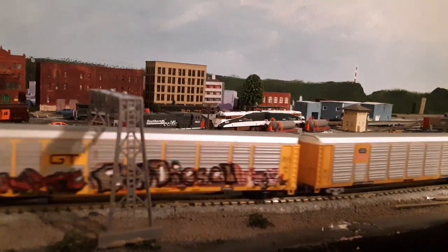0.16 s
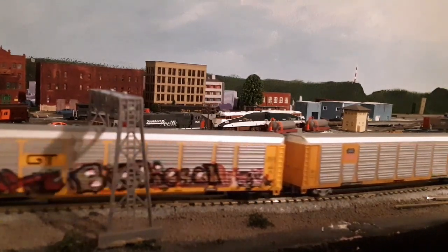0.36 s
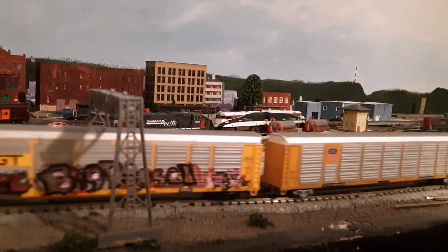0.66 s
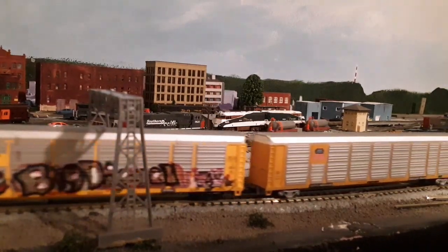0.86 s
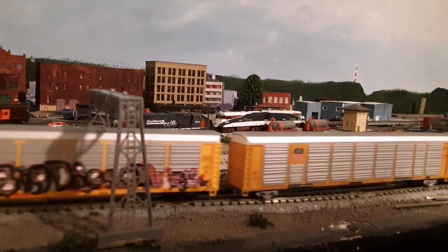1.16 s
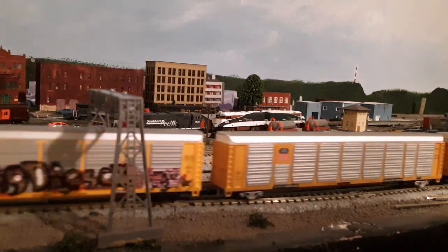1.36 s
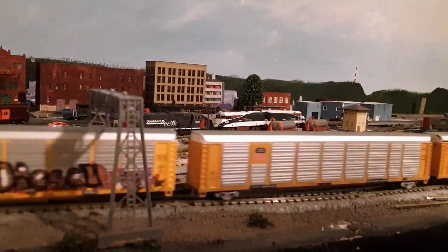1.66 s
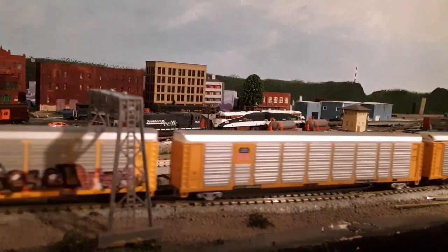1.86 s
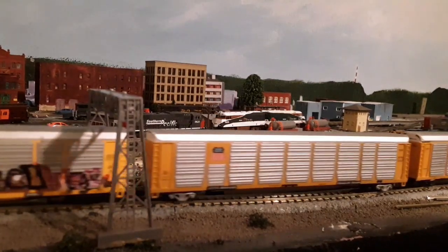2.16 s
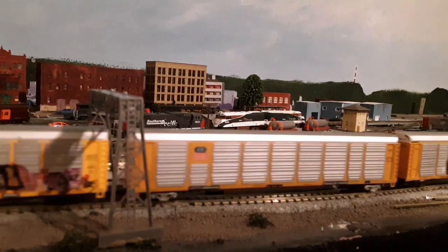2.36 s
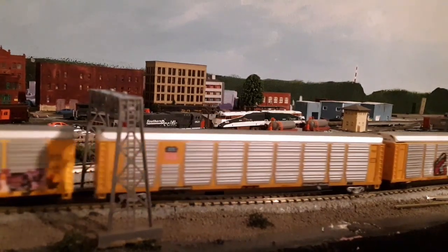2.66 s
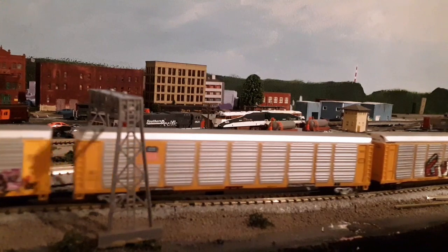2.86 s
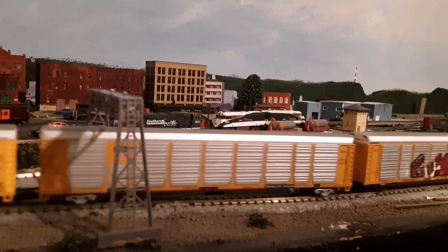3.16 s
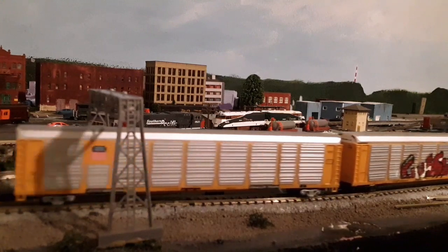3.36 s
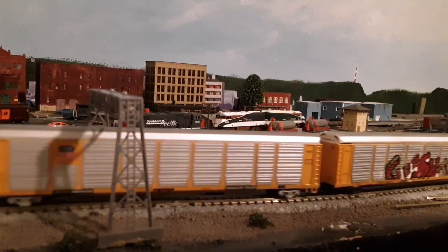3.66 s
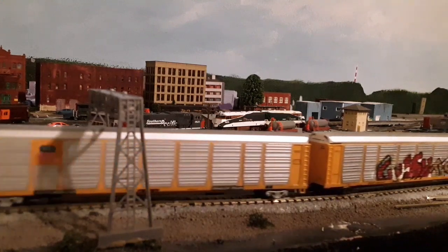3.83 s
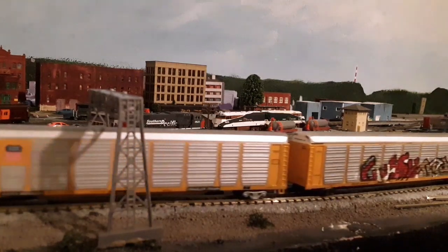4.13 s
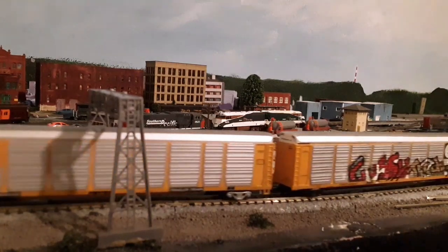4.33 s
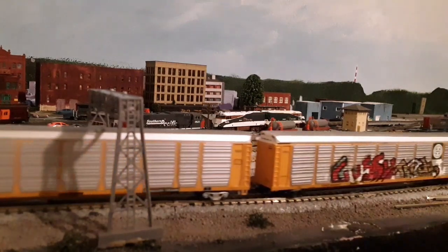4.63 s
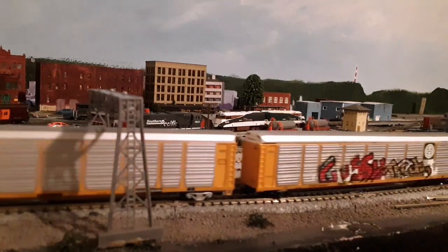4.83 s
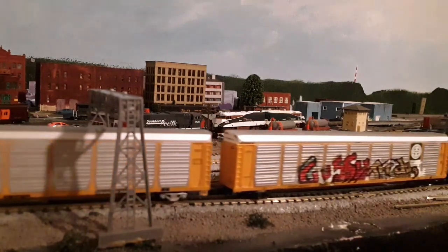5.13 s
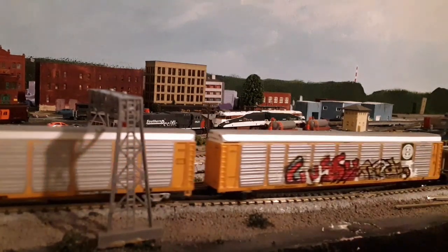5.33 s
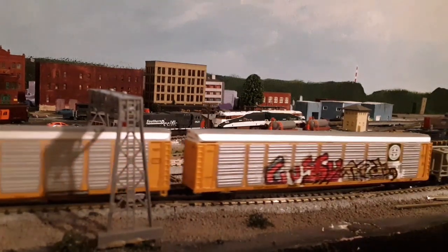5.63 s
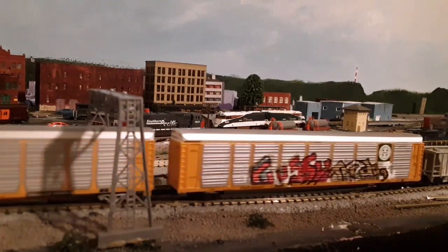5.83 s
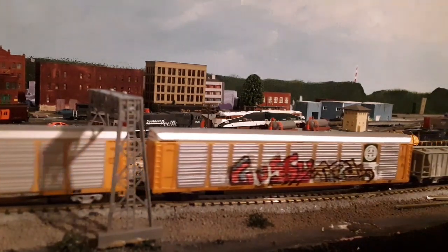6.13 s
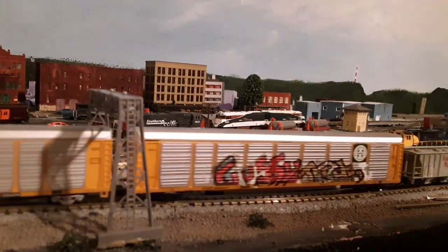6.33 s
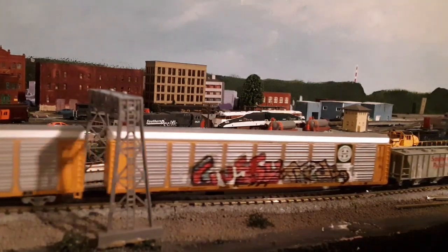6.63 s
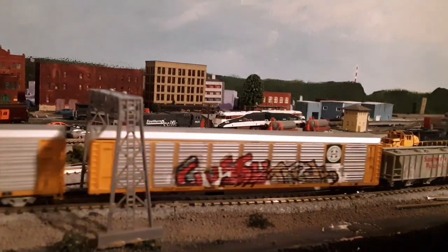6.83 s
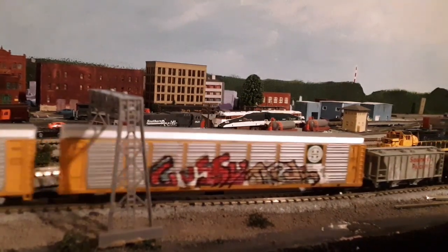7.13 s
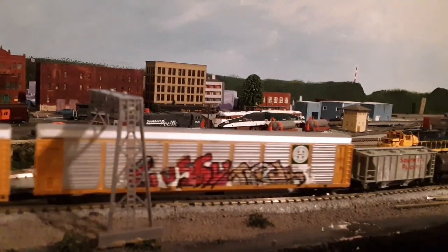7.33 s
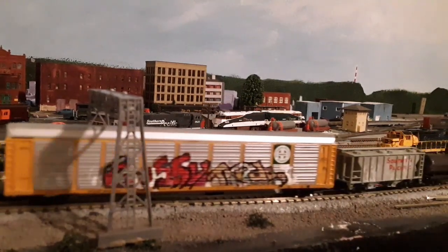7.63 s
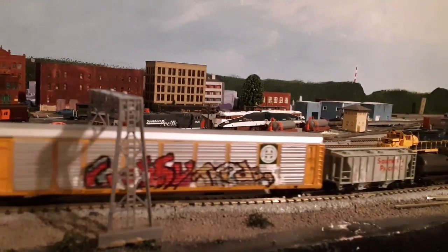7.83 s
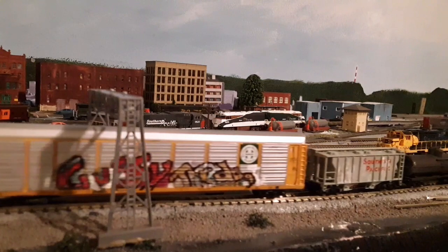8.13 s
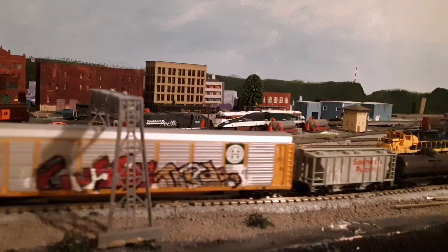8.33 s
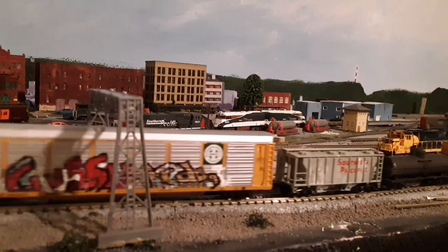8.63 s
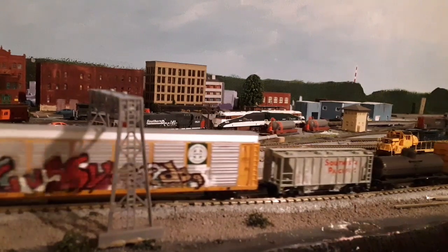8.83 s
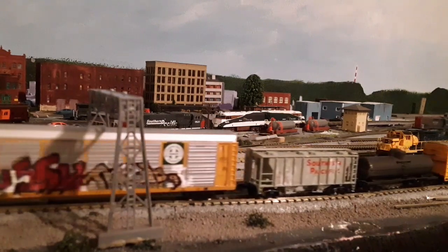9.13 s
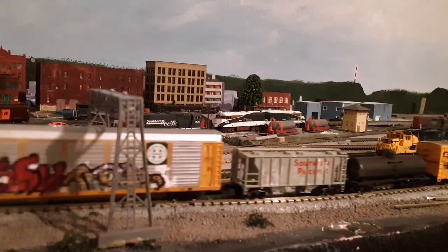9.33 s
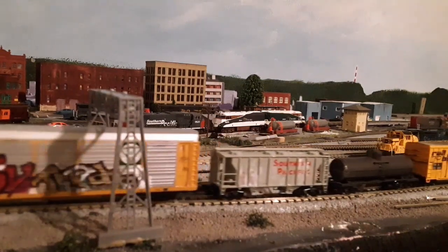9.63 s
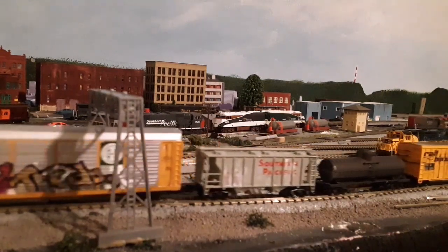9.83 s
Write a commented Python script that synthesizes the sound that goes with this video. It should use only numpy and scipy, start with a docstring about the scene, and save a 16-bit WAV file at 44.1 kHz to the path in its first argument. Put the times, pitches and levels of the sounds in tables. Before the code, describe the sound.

Close beside a model railway track, small wheels hiss and tick quietly, with light crackle and short brushes against the rail. Twice in the first half, the slack between the plastic freight cars runs out in a loud, sharp clatter that rings briefly in the small room. A duller jolt later thumps the board underneath, and lighter clacks follow as the rolling carries on.

```python
"""Small wheels hiss and tick as model freight cars roll slowly past a stereo microphone at trackside.
Now and then slack runs through the train: a sharp rattling clack rings in the hollow plastic shells
and the small room. Rough treads keep the cars and the baseboard droning, flanges brush the rail and
specks crackle under the wheels. Late on, a jolt thumps the board; near the end it hums briefly."""
import sys
import numpy as np
from scipy import signal
from scipy.fft import rfft, irfft, next_fast_len
from scipy.io import wavfile

SR = 44100
rng = np.random.default_rng(int(sys.argv[2]) if len(sys.argv) > 2 else 0)


def digitize_waveform(pressure):
    """Quantize a signal to 16-bit integers and store it at the path in sys.argv[1].

    Rows of a 2-D input are taken as channels; values are limited to [-1, 1].
    """
    field = np.atleast_2d(pressure).T
    bounded = np.clip(field, -1, 1)
    quanta = np.round(bounded * 32767).astype(np.int16)
    wavfile.write(sys.argv[1], SR, quanta)


N = 440118
TIME = np.arange(N) / SR
FFT_SIZE = next_fast_len(N, True)
FFT_HZ = np.fft.rfftfreq(FFT_SIZE, 1 / SR)
LEFT_RIGHT = np.array([[.5], [-.5]])  # splits a pan_db between the microphones; positive is left

# Jolts of the cars, heard from trackside:
# start_s, level_db, bass_db, middle_db, top_db, pan_db, ring_db, lower_note_hz, upper_note_hz
JOLTS = [(1.1584, -46, -1.5, 4, -6, 13, 3.5, 2040, 2750), (1.179, -35, -1, -2.5, 2.5, 11, 3, 1740, 3600),
         (1.2077, -19.5, -3.5, -8.5, -2.5, -2, -6.5, 4800, 6100),
         (3.136, -52, -11, 7.5, -12, 5, -8, 1920, 2820),
         (3.252, -47.5, -5, -13, -10.5, -5, -1.5, 2000, 5700),
         (3.516, -48.5, -5, -2, -6, -3, -0.5, 1175, 3300),
         (3.5268, -43.5, -4, 1.5, -1, 10, 5.5, 1660, 3300),
         (3.5521, -22.5, -8, -1.5, 1, -1.5, -7.5, 1600, 2650),
         (3.5884, -19.5, -5, -4.5, -2, -7, -2, 1190, 3250),
         (7.398, -28, -1.5, -1, -9.5, -8, -4, 2060, 3800),
         (7.9475, -37.5, -10, 0.5, -12.5, -7, -1, 1660, 3250),
         (8.08, -53, -14.5, 0.5, -17, -6, 1.5, 1570, 2930),
         (9.89, -39.5, -13, -2, -5, -10.5, -13.5, 1560, 6640)]
# Tone shared by all jolts: frequency_hz, gain_db
JOLT_SPECTRUM = [(30, -35.5), (100, -7.5), (250, -4.5), (700, -6), (1100, -5), (1700, -6.5), (2800, -3.5),
                 (4000, -3.5), (5500, -0.5), (6800, -0.5), (7400, -8), (9000, -10.5), (11500, -5),
                 (16000, -6.5)]
def clacks(trim_db=-0.84, ring_trim_db=1.5, note_width_hz=400, hard_db=-21.5, lift_per_db=0.184):
    """Slack runs through the cars: a hard jolt shakes a whole shell, a light one favours two notes."""
    out = np.zeros((2, N))
    for start, db, bass, middle, top, pan, ring, lower, upper in JOLTS:
        tone = [(600, bass), (1100, (bass + middle) / 2), (1500, middle), (2400, middle),
                (3800, 0), (6500, 0.0077), (9500, top)]
        hit = strike(pan, ring + ring_trim_db, chatter_s=0.00098)
        lift_db = 3.5 + lift_per_db * (hard_db - db)

        def colour_db(hz):
            notes = lift_db * (bell(hz, lower, note_width_hz) + 0.73 * bell(hz, upper, note_width_hz))
            uneven = 1.2 * ripple(hz) / (1 + (hz / 9000) ** 4)
            return spectrum(JOLT_SPECTRUM, hz) + spectrum(tone, hz) + notes + uneven

        add(out, start, amp(db + trim_db) * through_shell(hit, colour_db))
    return out


def strike(pan_db, ring_db, chatter_s, echo_db=-16, echoes=6, lag_s=.0004, thin_hz=700, size=24576):
    """A brief chatter of contact, first bounces off the board and cars, then the ring-out."""
    out = amp(ring_db) * ring_out(size)
    t = np.arange(512) / SR
    envelope = t / chatter_s * np.exp(-t / chatter_s)
    contact = envelope * rng.standard_normal(len(t))
    for _ in range(3):  # a hard contact is short and excites all frequencies evenly
        contact = np.sqrt(envelope) * irfft(np.exp(1j * np.angle(rfft(contact))))
    pole = np.exp(-2 * np.pi * thin_hz / SR)
    contact = signal.lfilter([1, -1], [1, -pole], contact)  # small parts radiate little bass
    contact *= np.sqrt(.0025 * SR / np.sum(contact ** 2))  # same energy for every contact
    for mic, gain in enumerate(sides(pan_db)[:, 0]):
        channel = out[mic:mic + 1]
        far = (mic == 0) == (pan_db < 0)  # the far microphone hears it later
        add(channel, lag_s * far, gain * contact[None])
        for delay_s, sign in zip(rng.uniform(.003, .012, echoes), rng.choice([-1, 1], echoes)):
            add(channel, delay_s, sign * gain * amp(echo_db) * contact[None])
    return out


# Decay of the cars and the small room around them: frequency_hz, t60_s
RING_DECAY = [(150, 0.25), (500, 0.28), (1500, 0.27), (3000, 0.25), (6000, 0.22), (9000, 0.22),
              (15000, 0.18)]
# Side from which that ring reaches the microphones: frequency_hz, pan_db
RING_PAN = [(150, 3), (300, 2.5), (600, 0.5), (1200, -0.5), (2400, 0.5), (4500, -3), (8000, -1.5),
            (13000, -0.5)]
def ring_out(size, late_db=-32, late_t60_s=0.64, build_s=0.0015, bass_build_cycles=4.1):
    """Dense reflections: treble arrives at once and dies first, bass builds up slowly."""
    t, hz = axes(size)
    field = diffuse(hz) * amp(spectrum(RING_PAN, hz) * LEFT_RIGHT)
    noise, out = rfft(unit(irfft(field))), 0
    centres = [f for f, _ in RING_DECAY]
    for (f, t60), pick in zip(RING_DECAY, np.eye(len(RING_DECAY))):
        band = irfft(noise * spectrum(np.c_[centres, pick], hz))
        fall = np.hypot(amp(-60 * t / t60), amp(late_db - 60 * t / late_t60_s))
        rise_s = build_s + bass_build_cycles / f * (f < 1000)
        out = out + band * fall * (1 - np.exp(-t / rise_s))
    return out


# Resonances of wheels and plastic shells: centre_hz, width_hz, lift_db
SHELL_MODES = [(1864, 400, 2.5), (2650, 160, 2), (3380, 490, 1), (4550, 230, 0.5), (5120, 280, 1),
               (6040, 310, 3.5), (6550, 210, 4.5)]
def shell_db(hz):
    """Wheels and shells lift their own bands in the clicks and the hiss."""
    return sum(db * bell(hz, centre, width) for centre, width, db in SHELL_MODES)


def through_shell(x, colour_db, size=4096):
    """A click rings through a tone curve and the shell modes, its loudness set by the 3-7 kHz band."""
    _, hz = axes(size)
    gain = amp(colour_db(hz) + shell_db(hz))
    gain /= np.sqrt(np.mean(gain ** 2 * ((hz > 3000) & (hz < 7000))))
    log_gain = np.log(np.r_[gain, gain[-2:0:-1]] + 1e-6)
    taps = np.fft.ifft(np.exp(np.conj(signal.hilbert(log_gain)))).real  # minimum phase
    return signal.oaconvolve(x, taps[None, :size // 2], axes=1)[:, :x.shape[1]]


# Rolling noise as the cars pass the microphones: time_s, hiss_db, drone_db
ROLL_LEVELS = [(0.0, -61, -73), (1.06, -60.5, -69), (1.44, -59.5, -68), (1.68, -62.5, -71),
               (2.52, -59, -71.5), (3.08, -61.0, -68), (3.32, -57, -68.5), (4.56, -67.5, -74.5),
               (4.8, -63, -70.5), (5.32, -63.3, -70.5), (5.48, -65, -70.5), (6.34, -63, -69.7),
               (7.8, -62.5, -69), (8.32, -60, -67.5), (8.72, -62, -69.5), (8.92, -57.3, -66.5),
               (9.08, -62, -69.4), (9.98, -59.5, -71.5)]
# Wheel hiss, car-body drone and the layout's rumble, each: frequency_hz, gain_db
HISS_SPECTRUM = [(300, -17.5), (900, -19), (1400, -6), (2000, 2), (2400, -2.5), (2900, -1), (4100, -4),
                 (6800, -7), (7400, -19), (8500, -20), (11000, -30), (16000, -30)]
DRONE_SPECTRUM = [(60, -40), (180, 6.5), (280, -1), (380, -2.5), (600, -1.5), (800, -3), (1150, 3),
                  (1600, 0.5), (3000, -28)]
RUMBLE_SPECTRUM = [(15, -18), (40, -15.5), (70, -9), (105, -0.5), (160, -3), (240, -8.5), (400, -28),
                   (1500, -27)]
# Where the rolling sits between the microphones: frequency_hz, pan_db
ROLL_PAN = [(100, 0.5), (250, 3.5), (700, 4.5), (1400, 2), (2100, 3), (2800, 9), (4400, 2.5), (6500, -2.5),
            (9000, 3), (15000, -2)]
def rolling(hiss_trim_db=-0.26, drone_trim_db=0.87, near_db=-8, lag_s=0.000419):
    """Rough treads on rail excite wheels, car bodies and board, unevenly as the wheels turn."""
    pan_db = spectrum(ROLL_PAN, FFT_HZ) * LEFT_RIGHT
    delay = np.exp(-2j * np.pi * FFT_HZ * np.array([[0], [lag_s]]))  # the nearest wheels are on the left

    def noise(table, lift_db=0):
        field = diffuse(FFT_HZ) + amp(near_db) * diffuse(FFT_HZ)[0] * delay
        return unit(waveform(field * amp(spectrum(table, FFT_HZ) + lift_db + pan_db)))

    hiss_db, drone_db = curves(ROLL_LEVELS)
    surge = drift(8.6)
    hiss = noise(HISS_SPECTRUM, shell_db(FFT_HZ))
    hiss *= amp(hiss_db + hiss_trim_db + 0.85 * surge + 1.44 * drift(122))
    # the long cars' ring dies away as they leave
    hiss = lifted(hiss, bell(FFT_HZ, 1960, 320), lift_db=2.5 - 0.51 * TIME)
    # the wheels rub harder and softer, mostly in the treble
    treble = FFT_HZ ** 4 / (FFT_HZ ** 4 + 4000 ** 4)
    hiss = lifted(hiss, treble, lift_db=2 * drift(3.5))
    drone = noise(DRONE_SPECTRUM) * amp(drone_db + drone_trim_db + 2.5 * surge)
    rumble = noise(RUMBLE_SPECTRUM) * amp(-73 + 0.3041 * TIME)
    return hiss + drone + rumble


def passing_sides(x, depth_db=1.77, cars=7):
    """Reflections off the moving car sides comb the sound; the comb changes from car to car."""
    hz, t, frames = signal.stft(x, SR, nperseg=2048)
    place = t / t[-1] * (cars - 1)
    fades = [np.sqrt(np.maximum(1 - abs(place - car), 0)) for car in range(cars)]
    comb = sum(fade * ripple(hz, longest_s=.014)[:, None] for fade in fades)
    band = ((hz > 250) & (hz < 7000))[:, None]
    return signal.istft(frames * amp(depth_db * comb * band), SR, nperseg=2048)[1][:, :N]


# Wheel taps that stand out at trackside: start_s, level_db, pan_db
WHEEL_TAPS = [(0.4152, -53.5, 7), (0.6779, -56, -9), (2.2464, -53, -15), (2.2968, -52.5, -20),
              (2.4537, -53, 8), (2.5098, -53, -10), (2.665, -50.5, 19), (3.355, -55, -10),
              (3.4812, -48.5, 10), (3.9874, -49.5, 8), (5.003, -57, 2), (5.452, -60, 3),
              (6.1749, -52.5, -14), (6.4977, -54, -25), (6.835, -51, 4), (8.909, -55.5, -15),
              (9.2764, -56.5, 5)]
# Tone of a small contact on the rail: frequency_hz, gain_db
TAP_SPECTRUM = [(100, -33), (1000, -16.5), (2000, -9), (3200, -2), (4600, -1.5), (6000, 0), (6900, 0),
                (7700, -9.5), (10000, -14), (16000, -18)]
def ticks(trim_db=2.5, hard_db=-46, top_per_db=.8):
    """Single wheels tap drily over flaws in the rail; the harder, the brighter."""
    out = np.zeros((2, N))
    for start, db, pan in list(WHEEL_TAPS) + faint_taps():
        tap = strike(pan, ring_db=-14, chatter_s=0.00083, size=8192)
        tone = [(6500, 0), (9000, 2 + top_per_db * (db - hard_db))]
        tap = through_shell(tap, lambda hz: spectrum(TAP_SPECTRUM, hz) + spectrum(tone, hz))
        add(out, start, amp(db + trim_db) * tap)
    return out


def faint_taps(per_s=3.1, lift_db=3.5, spread_db=1.7, pan_spread_db=10, candidates=60):
    """Fainter taps fall at random and follow the hiss level; rows like WHEEL_TAPS."""
    when, chance = rng.random((2, candidates))
    softness, side = rng.standard_normal((2, candidates))
    hiss_db = curves(ROLL_LEVELS)[0][(when * N).astype(int)]
    rows = np.c_[when * N / SR, hiss_db + lift_db - spread_db * softness, pan_spread_db * side]
    return list(rows[chance < per_s * N / SR / candidates])


# Modes of the board under the track: pitch_hz, relative_db, t60_s
BOARD_MODES = [(42, -16, 0.33), (163, 4.5, 0.16), (288, 4.5, 0.11), (608, 1.5, 0.13), (804, -12, .1)]
def board_thump(start_s=7.402, gain_db=-45, rise_s=0.0097):
    """One heavy jolt sets the baseboard's modes ringing."""
    t = np.maximum(TIME - start_s, 0)
    modes = sum(amp(db - 60 * t / t60) * np.sin(2 * np.pi * f * t) for f, db, t60 in BOARD_MODES)
    return amp(gain_db) * modes * (1 - np.exp(-t / rise_s))


def board_hum(on_s=8.2, off_s=8.98, pitch_hz=156, waver_hz=1.5, peak_db=-65.5, flutter_db=2):
    """One mode of the board hums: it rises, swells slowly and dies."""
    turns = np.cumsum(pitch_hz + waver_hz * drift(7)) / SR
    swell_db = peak_db + 2 * (TIME - off_s)
    fade_db = 47 * np.maximum(on_s - TIME, 0) + 65 * np.maximum(TIME - off_s, 0)
    envelope = amp(swell_db - fade_db + flutter_db * drift(16))
    return envelope * unit(np.sin(2 * np.pi * turns)) * sides(pan_db=2)


# Soft knocks from the passing cars: start_s, level_db, pitch_hz
BODY_KNOCKS = [(3.261, -68, 435), (7.511, -49, 477), (7.848, -56, 443), (8.34, -62.5, 465)]
def knocks(t60_s=0.27, rise_s=0.0042, width_hz=140, size=16384):
    """A hollow car body rings dully in one narrow band."""
    out = np.zeros((2, N))
    t, hz = axes(size)
    for start, db, pitch in BODY_KNOCKS:
        body = unit(irfft(diffuse(hz) * bell(hz, pitch, width_hz)))
        add(out, start, amp(db) * body * (1 - np.exp(-t / rise_s)) * amp(-60 * t / t60_s))
    return out


# Flange rubs, spread across both microphones: start_s, length_s, level_db, centre_hz
FLANGE_RUBS = [(0.118, .1, -62, 2980), (0.83, 0.21, -63.5, 2800), (1.356, 0.021, -55.5, 2014),
               (1.566, 0.024, -59, 2600), (2.363, 0.047, -56.5, 2610), (4.928, 0.14, -63, 2700),
               (5.631, 0.13, -61, 2100), (6.132, 0.17, -60.5, 2120), (6.401, .07, -63, 2200),
               (6.83, .06, -64, 2800)]
def flange_scrapes(size=16384):
    """Flanges brush the rail in short swells of rough friction."""
    out = np.zeros((2, N))
    t, hz = axes(size)
    colour = amp(spectrum(HISS_SPECTRUM, hz) + shell_db(hz))
    for start, length, db, centre in FLANGE_RUBS:
        rub = unit(irfft(diffuse(hz) * colour * bell(hz, centre, width=centre)))
        age = t / (length / 2)  # 1 at the crest of the swell
        add(out, start, amp(db) * rub * age * np.exp((1 - age ** 2) / 2))
    return out


# Air notes of the later cars, a little to the left: pitch_hz, level_db
HOLLOW_NOTES = [(585, -85), (735, -82.5), (1120, -81.5)]
def body_notes(boom_hz=107, near_s=4.6, rise_s=0.22, wander_db=4.5):
    """The board's boom fades as the head of the train leaves; hollow cars ring as they draw near."""
    def note(pitch_hz, width_hz):
        return unit(waveform(diffuse(FFT_HZ) * bell(FFT_HZ, pitch_hz, width_hz)))

    boom = amp(-71 - 2 * TIME) * note(boom_hz, width_hz=30)
    hollow = sum(amp(db + wander_db * drift(1)) * note(f, width_hz=130) for f, db in HOLLOW_NOTES)
    arrival = np.clip((TIME - near_s) / rise_s, 0, 1)
    return boom + hollow * arrival * sides(pan_db=3)


def grit(per_s=40, level_db=-73):
    """Specks on the rails crackle under the many wheels, following the hiss level."""
    strength = amp(3.6 * np.minimum(rng.exponential(1, (2, N)), 3))
    specks = strength * rng.choice([-1, 1], (2, N)) * (rng.random((2, N)) < per_s / SR)
    click = strike(pan_db=0, ring_db=-15, chatter_s=0.00033, size=8192)
    crackle = signal.oaconvolve(specks, click, axes=1)[:, :N]
    crackle = through_shell(crackle, lambda hz: spectrum(TAP_SPECTRUM, hz))
    return amp(level_db) * unit(crackle * amp(curves(ROLL_LEVELS)[0]))


def microphone_hiss(level_db=-78):
    """Steady self-noise, the same whether wheels are near or far."""
    return amp(level_db) * rng.standard_normal((2, N))


# How alike the room sounds at the two microphones: frequency_hz, coherence
MIC_COHERENCE = [(50, 0.43), (130, 0.8), (290, 0.57), (640, 0.27), (1400, -0.2), (3000, -0.033),
                 (16000, -0.024)]
def diffuse(hz):
    """Spectra of diffuse noise at the left and right microphones."""
    a, b, c, d = rng.standard_normal((4, len(hz)))
    same = np.clip(spectrum(MIC_COHERENCE, hz), -1, 1)
    left = a + 1j * b
    return np.array([left, same * left + np.sqrt(1 - same ** 2) * (c + 1j * d)])


def ripple(hz, longest_s=.008, count=24):
    """Comb of rms 1 that nearby surfaces put on a spectrum."""
    cycles = (hz * rng.uniform(0.001026, longest_s) + rng.random() for _ in range(count))
    return unit(sum(np.cos(2 * np.pi * c) for c in cycles))


def drift(rate_hz):
    """Random wander of rms 1."""
    return unit(waveform(rfft(rng.standard_normal(FFT_SIZE)) * np.exp(-(FFT_HZ / rate_hz) ** 2)))


def lifted(x, band, lift_db):
    """Raises or lowers one band by a level that changes in time."""
    return x + (amp(lift_db) - 1) * waveform(rfft(x, FFT_SIZE) * band)


def bell(hz, centre, width):
    """Height of a resonance, 1 at its centre."""
    return 1 / (1 + (2 * (hz - centre) / width) ** 2)


def spectrum(points, hz):
    """Interpolates a table on a log-frequency axis."""
    f, value = np.transpose(points)
    return np.interp(np.log(hz + 1), np.log(f + 1), value)


def curves(rows):
    """Each column of a time table, sample by sample."""
    times, *columns = np.transpose(rows)
    return [np.interp(TIME, times, column) for column in columns]


def axes(size):
    return np.arange(size) / SR, np.fft.rfftfreq(size, 1 / SR)


def waveform(bins):
    return irfft(bins, FFT_SIZE)[..., :N]


def sides(pan_db):
    """Left and right gains of constant power."""
    return unit(amp(pan_db * LEFT_RIGHT))


def amp(db):
    return 10 ** (np.asarray(db) / 20)


def unit(x):
    """Scales to rms 1."""
    return x / np.sqrt(np.mean(x ** 2) + 1e-20)


def add(mix, start_s, sound):
    part = mix[:, max(round(start_s * SR), 0):][:, :sound.shape[1]]
    part += sound[:, :part.shape[1]]


def scene():
    """From beside the track: a rolling bed, loud jolts, the board beneath and small ticks."""
    bed = passing_sides(rolling() + flange_scrapes()) + body_notes() + grit() + microphone_hiss()
    return bed + clacks() + knocks() + board_thump() + board_hum() + ticks()


def record(dry):
    """The trackside camera's stereo microphone cuts off at 16.1 kHz."""
    lowpass = signal.firwin(511, 16100, window=("kaiser", 9), fs=SR)
    return signal.oaconvolve(dry, lowpass[None], "same")


dry = scene()
out = record(dry)
digitize_waveform(out)
```